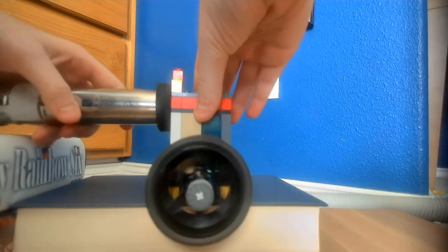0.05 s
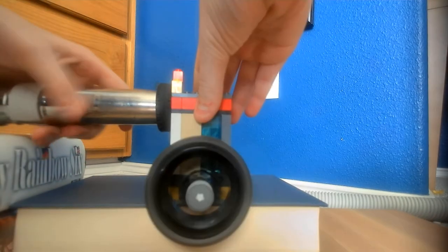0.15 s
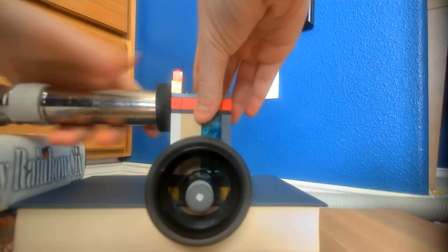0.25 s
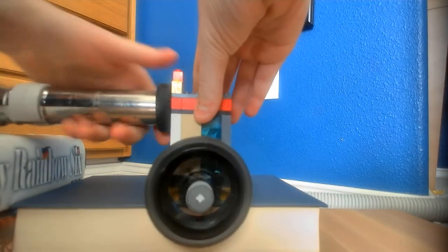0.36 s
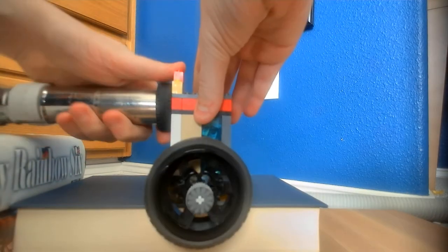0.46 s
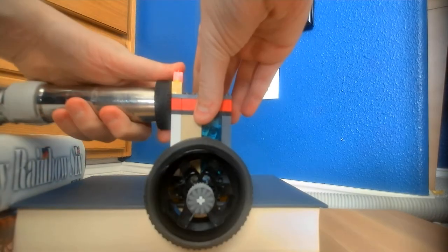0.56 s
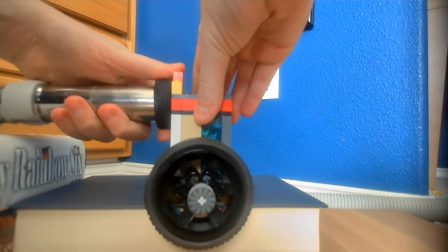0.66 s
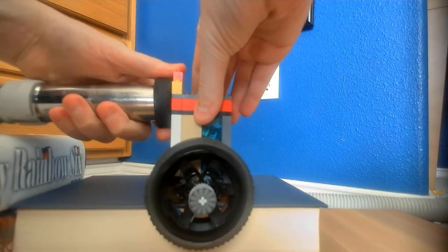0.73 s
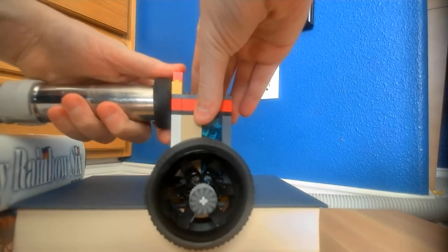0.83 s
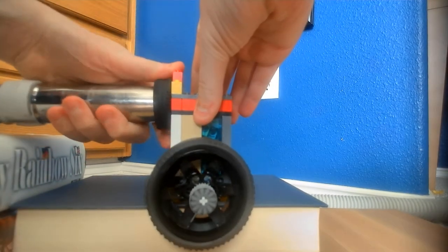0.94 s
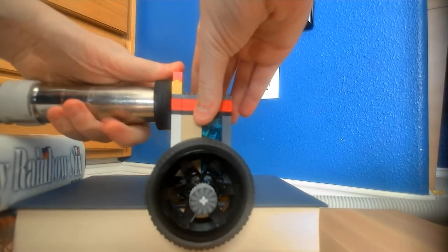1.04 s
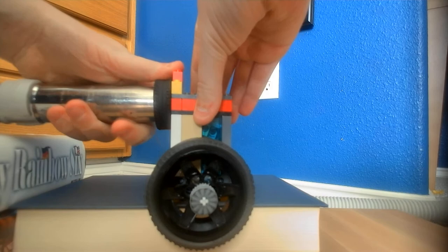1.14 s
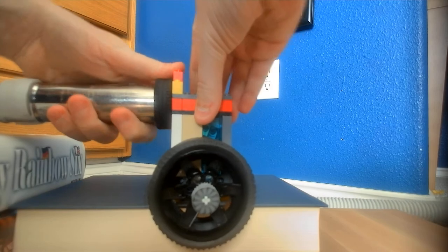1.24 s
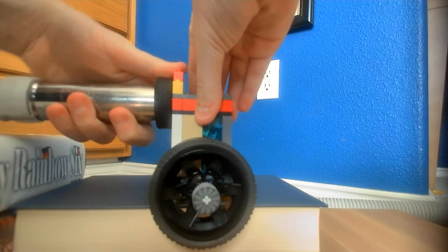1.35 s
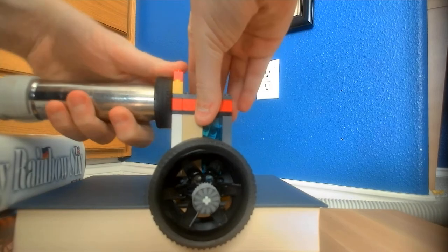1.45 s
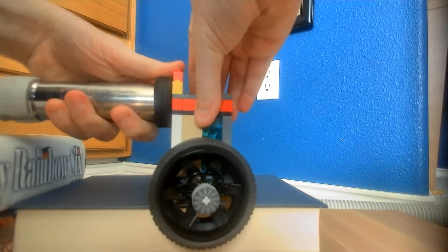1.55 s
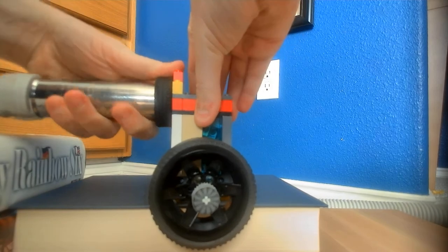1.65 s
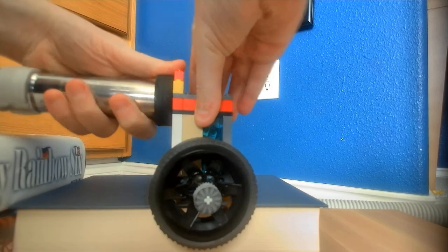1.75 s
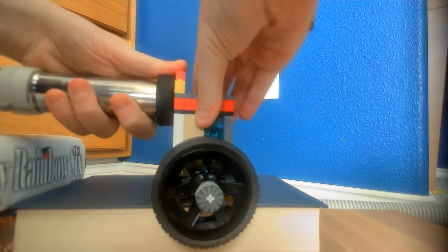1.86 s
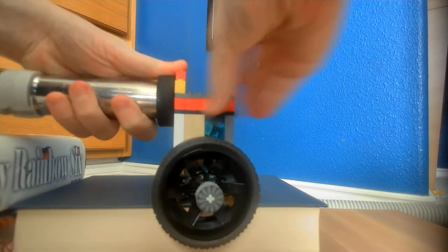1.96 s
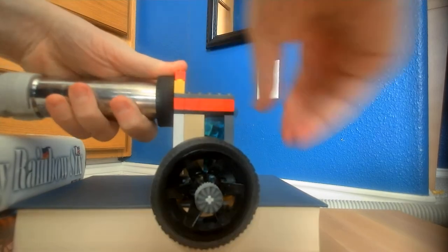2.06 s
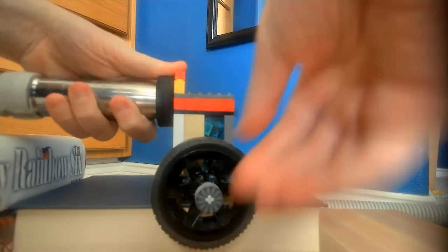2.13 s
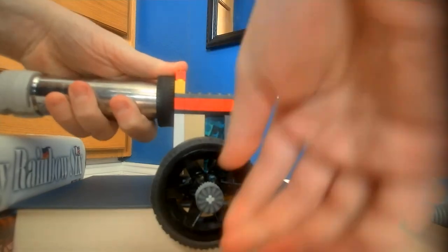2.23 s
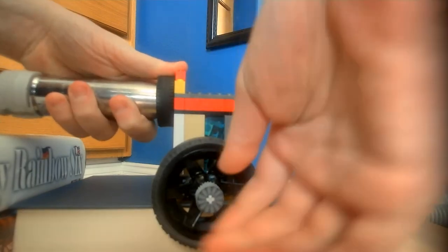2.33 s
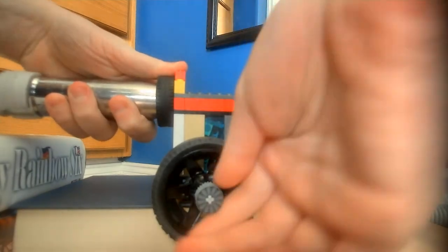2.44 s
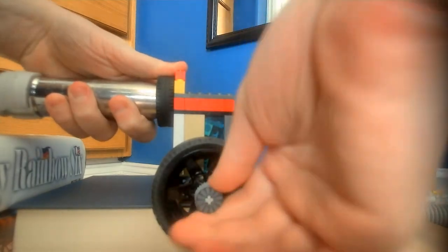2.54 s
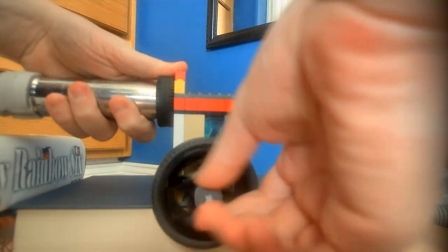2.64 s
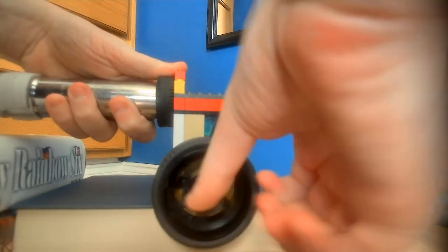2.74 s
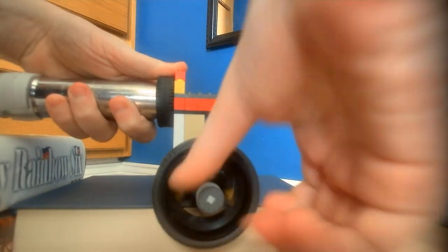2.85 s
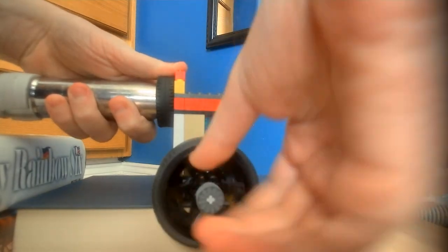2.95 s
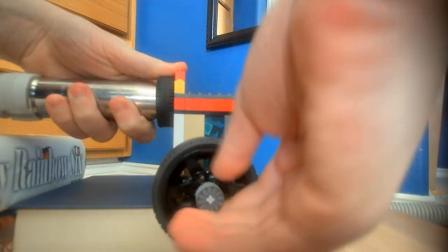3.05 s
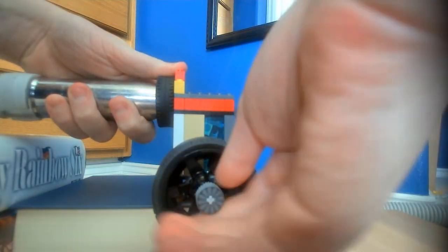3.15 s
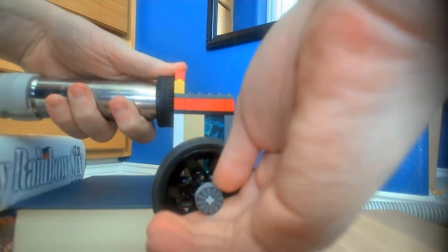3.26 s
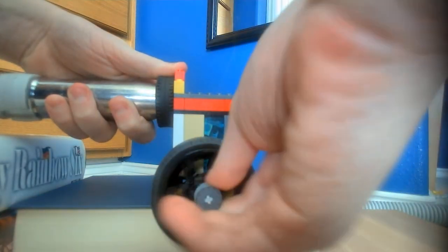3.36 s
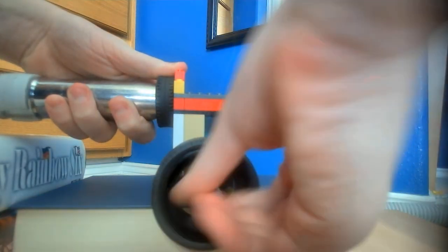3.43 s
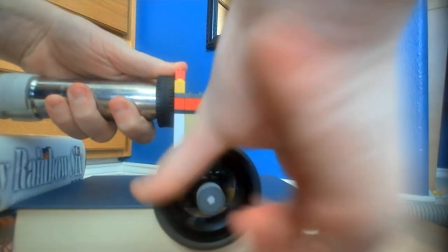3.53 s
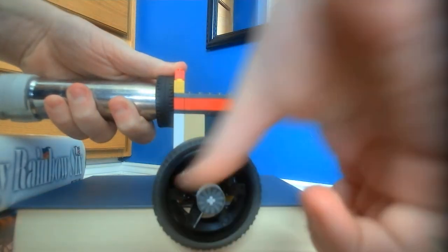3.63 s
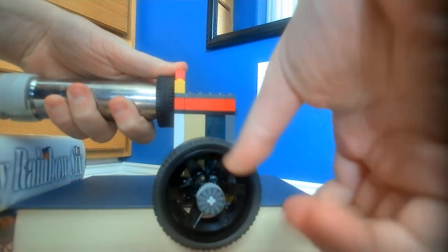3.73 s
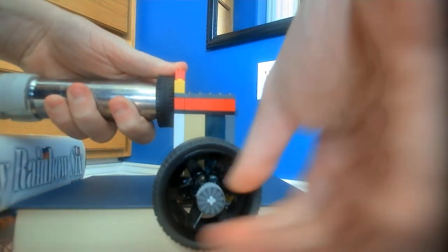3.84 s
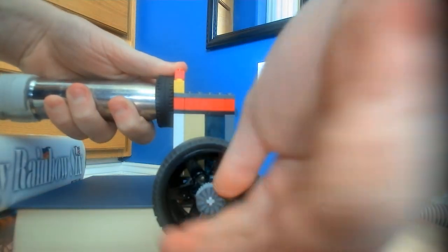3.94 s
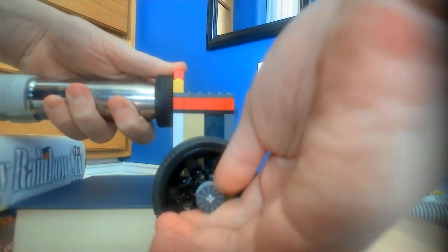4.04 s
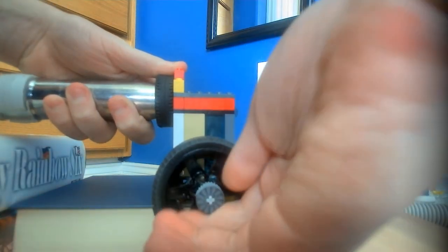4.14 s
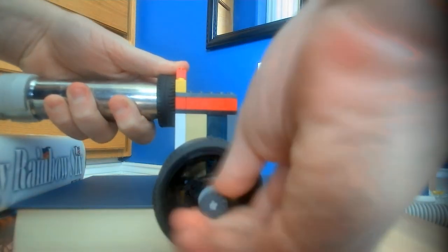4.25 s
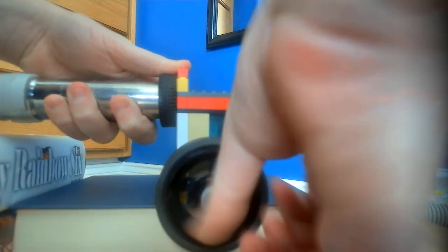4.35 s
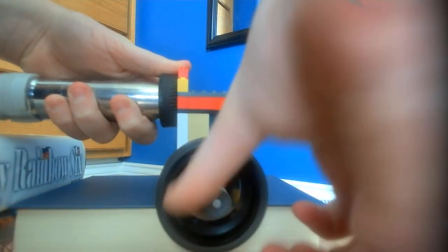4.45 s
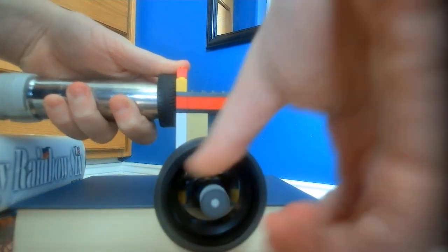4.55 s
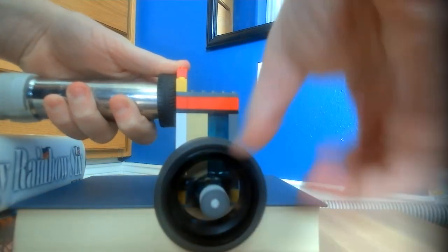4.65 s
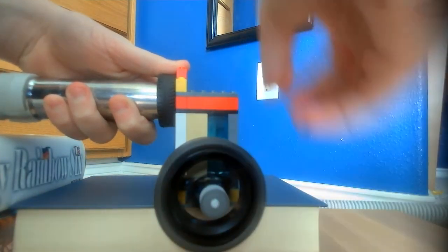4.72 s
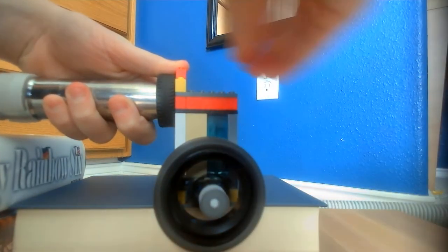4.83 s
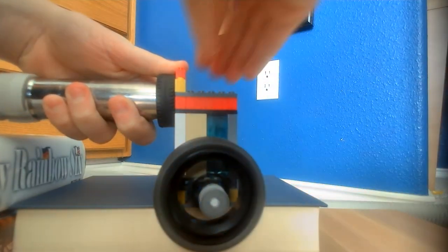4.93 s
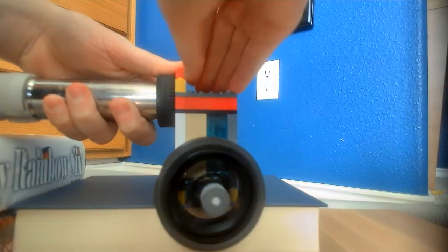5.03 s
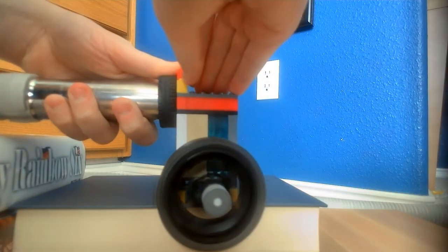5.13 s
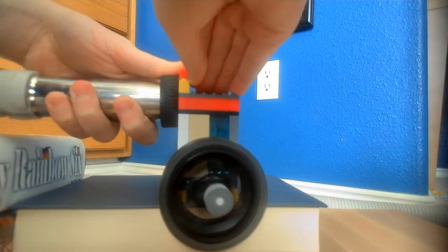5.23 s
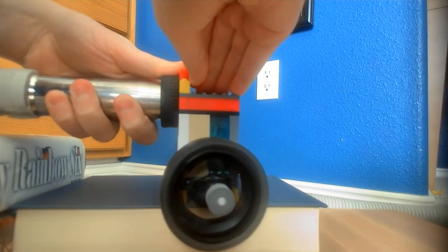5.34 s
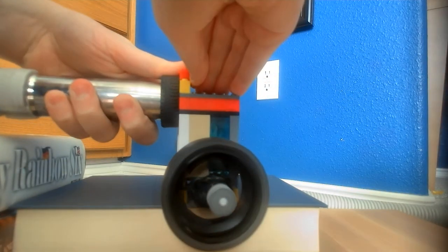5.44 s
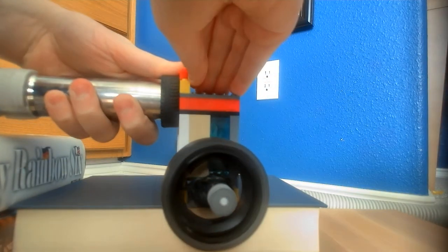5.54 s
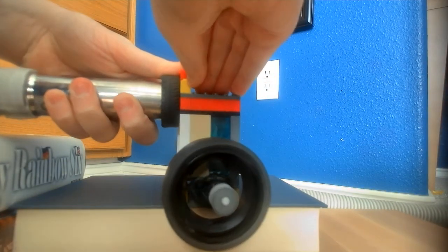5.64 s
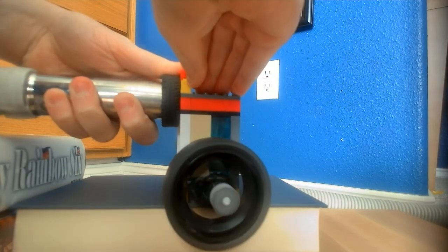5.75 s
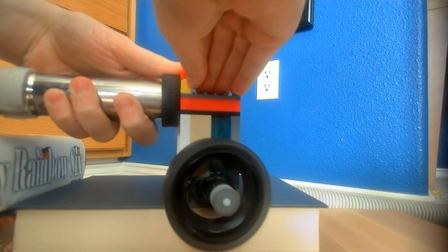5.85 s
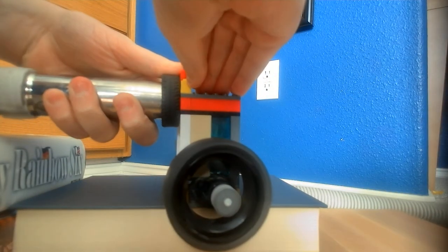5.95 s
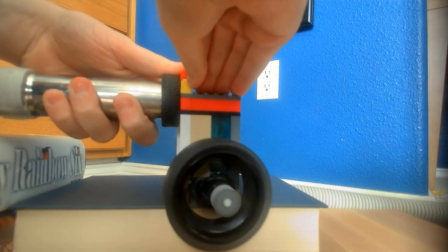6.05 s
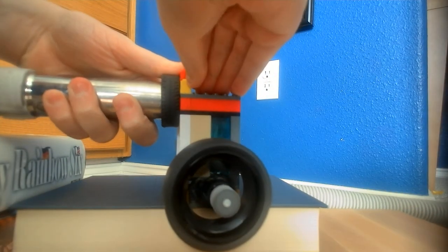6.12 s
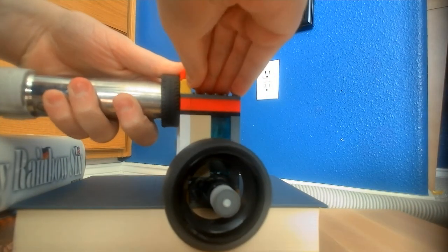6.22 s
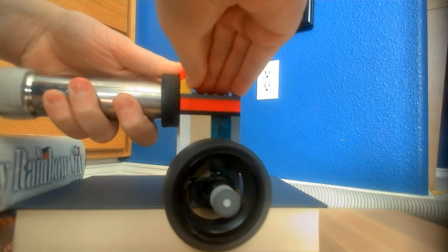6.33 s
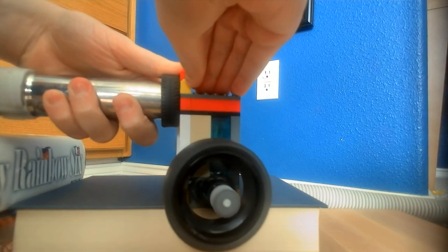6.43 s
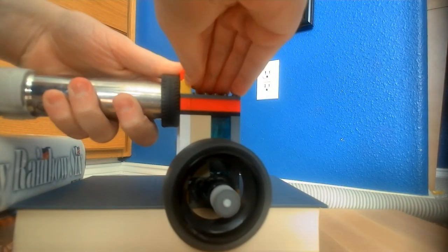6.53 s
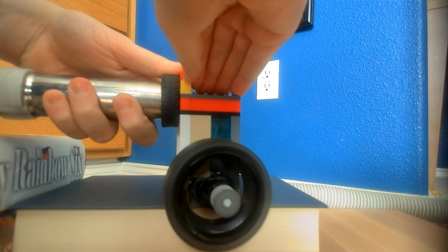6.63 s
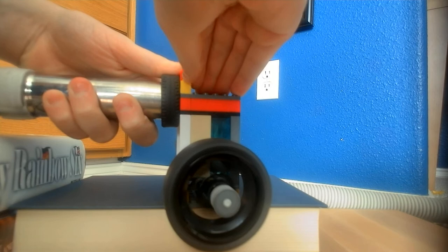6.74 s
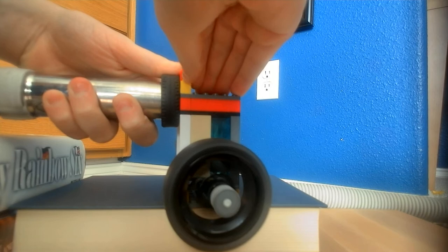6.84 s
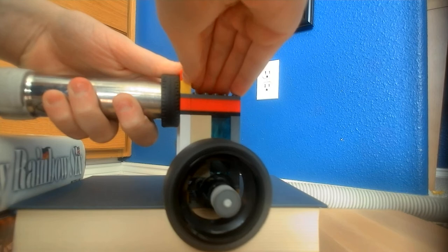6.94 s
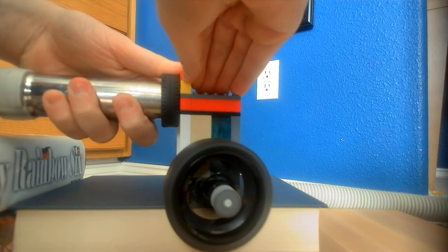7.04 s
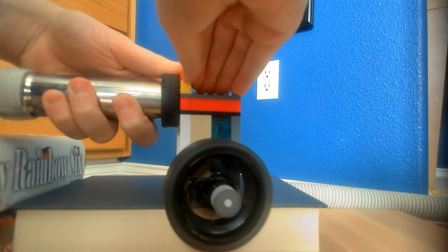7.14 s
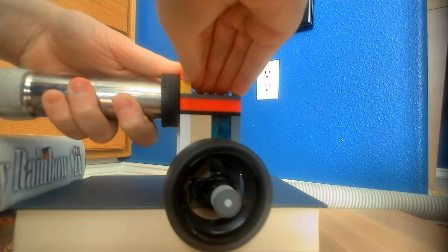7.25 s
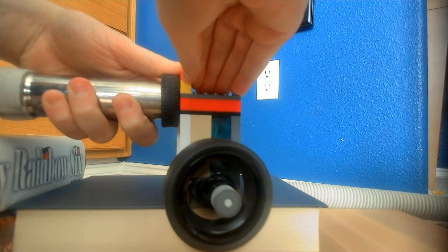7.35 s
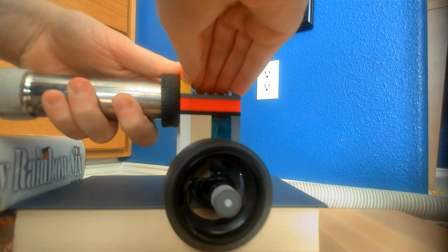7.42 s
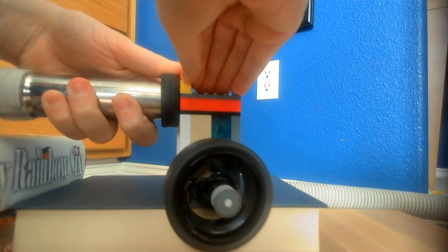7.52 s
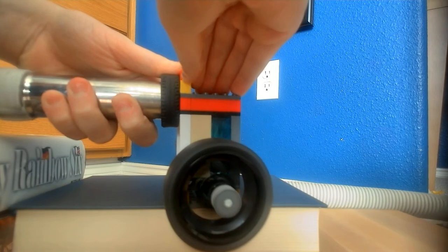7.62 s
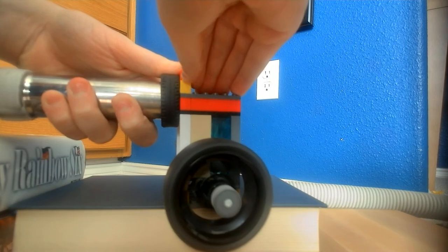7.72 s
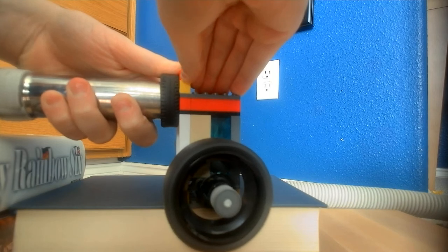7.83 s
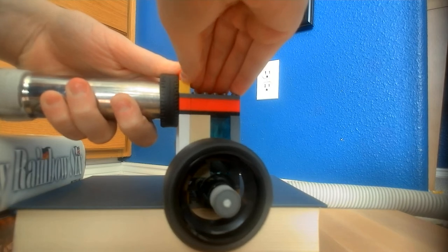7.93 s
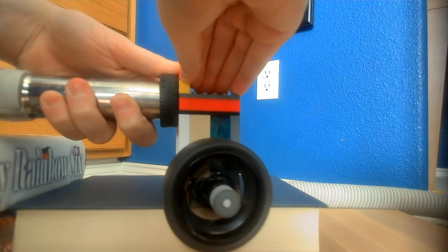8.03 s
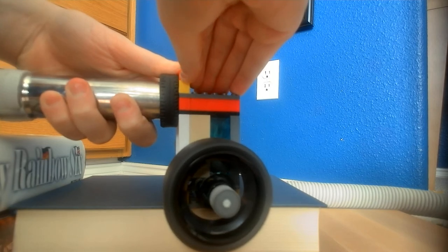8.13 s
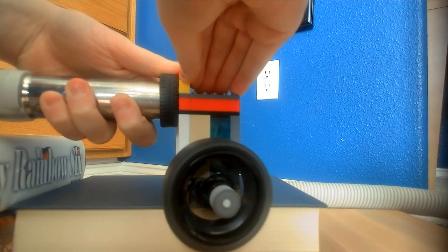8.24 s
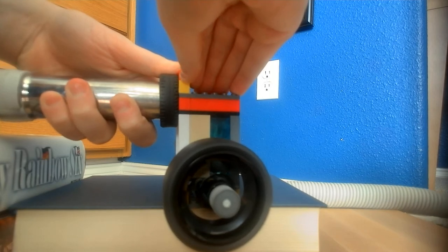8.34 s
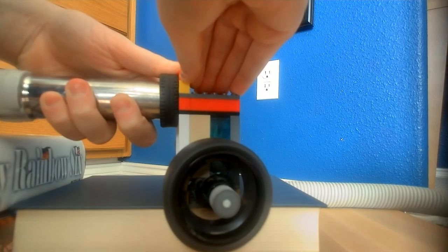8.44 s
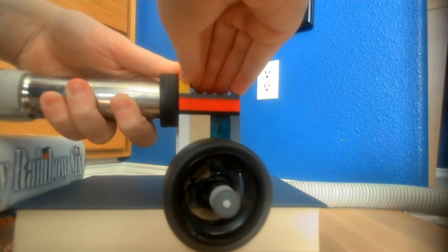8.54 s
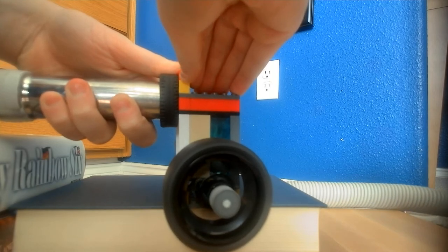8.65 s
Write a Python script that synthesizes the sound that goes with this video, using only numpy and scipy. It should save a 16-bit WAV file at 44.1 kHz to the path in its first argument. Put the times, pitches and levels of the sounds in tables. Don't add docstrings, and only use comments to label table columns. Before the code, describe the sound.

Close, overloaded suction hiss with brief squeaks and bursts, then a toy air engine starts chugging, accelerates quickly and drones with hard rattling.

```python
import sys
import numpy as np
from scipy import signal
from scipy.fft import rfft, irfft, next_fast_len
from scipy.io import wavfile
from scipy.ndimage import uniform_filter1d

SR = 44100
rng = np.random.default_rng(int(sys.argv[2]) if len(sys.argv) > 2 else 0)


def pcm_store(signal):
    levels = np.round(np.clip(np.atleast_2d(signal), -1, 1) * 32767)
    wavfile.write(sys.argv[1], SR, levels.astype(np.int16).T)


def natural_amplitude(level_db):
    exponent = np.asarray(level_db, float) / 20
    return 10 ** exponent


N = 382788
TIME = np.arange(N) / SR

# hz, level_db (per Hz)
RUMBLE_COLOUR = [(12, -38), (20, -8), (92, -7.5), (128, -6), (179, -5), (219, -3.5), (420, -8.5),
                 (550, -31), (920, -120)]
ROAR_COLOUR = [(250, -26), (420, -16), (600, -9.5), (800, -7), (900, -5), (990, -3.5), (1045, 0),
               (1100, -2.5), (1190, -8.5), (1300, -14.5), (1600, -21.5), (2600, -23), (3200, -27)]
WHISTLE_COLOUR = [(1500, -19), (1640, -1.5), (1740, -1.5), (1780, 7), (1830, -3.5), (1920, 0),
                  (2020, -20.5)]
EDGE_COLOUR = [(1900, -6.5), (2200, -7), (2900, -8.5), (3150, -3), (3320, -0.5), (3550, -2.5), (3850, 0),
               (4150, -5), (4700, -6)]
# hz, level_db (per Hz)
PORT_COLOUR = [(3900, -29), (4400, -6), (4700, 0.5), (5200, -1), (6000, 1), (6400, -1.5), (6700, 1),
               (7800, -1.5), (8600, -4), (9200, -10.5), (10000, -15)]
LOW_GAP_COLOUR = [(4600, -26), (5150, -11), (5400, 4), (5650, -8), (5950, -1.5), (6300, -4), (7000, -19)]
HIGH_GAP_COLOUR = [(6300, -13), (6900, -9.5), (7470, -2), (8000, -5), (8800, -4.5), (9400, -2.5),
                   (9900, -39)]
# hz, level_db (per Hz)
NOZZLE_COLOUR = [(8800, -22), (9700, 0), (11000, -3), (12500, -5), (14600, -3), (16500, 6)]
# pitch_hz, width_hz, level_db
NOZZLE_MODES = [(11780, 380, -1), (13200, 250, -2), (13980, 200, 4), (15620, 180, 6)]
# resting_db, full_opening_db (more),
# parked_db (more), running_db, full_speed_db (more)
AIR_LEVELS = dict(rumble=(-34.5, 7, -1, -26.5, -1), roar=(-17.5, 6.5, -5, -15, 0.5),
              whistle=(-28, 13.5, 3, -19.5, 3), edge=(-23.5, 9, -1.5, -21.5, 4.5),
              port=(-26.5, 6.5, -1, -19, 1.5), low_gap=(-27, 11, 4.5, -20, -15),
              high_gap=(-20, -1, 1, -22, 0), suction=(-19, 0, -2, -18, -0.5))
# start_s, length_s, opening (1 wide, 0 resting leak, -1 shut)
SLIDE_MOVES = [(-.05, 0.19, 0.78), (.13, .07, 0.29), (.22, 0.055, 0.65), (.25, 0.11, .3), (.34, 0.15, 0.55),
               (1.42, 0.26, 0.077), (2.575, .14, 0.86), (2.71, 0.059, -0.53), (2.755, .035, 0.62),
               (3.33, 0.12, 0.82), (3.435, 0.022, -.6), (3.47, 0.08, 0.86), (4.205, 0.038, 0.013)]
# start_s, length_s, raise_db
HAND_SHIFTS = [
    (0.087, 0.33, 6.5),
    (.9, 0.44, 3.5),
]
# start_s, length_s, pitch_hz, width_hz, level_db
SEAM_HISSES = [(-.1, .62, 5950, 700, -17), (.35, 1.1, 6000, 700, -18), (.3, .9, 8300, 1500, -20),
               (.7, 1.35, 7480, 400, -21), (.9, 1.25, 8900, 900, -19), (1.6, .45, 5500, 800, -16),
               (2.1, .3, 5800, 1000, -17), (2.16, .3, 8500, 1200, -15), (2.2, 1.1, 3320, 350, -23),
               (.2, 1.9, 3300, 350, -24), (2.85, .6, 5600, 900, -16), (2.8, .5, 7650, 500, -21),
               (3.46, .5, 7300, 900, -15), (3.48, .14, 8900, 1200, -15), (3.7, .25, 8700, 1200, -15),
               (3.5, .45, 5600, 900, -16), (3.8, .44, 5700, 900, -13)]
# start_s, length_s, from_hz, to_hz, level_db
GAP_SQUEAKS = [
    (.28, .125, 15680, 15230, -15),
    (3.395, .03, 8900, 8250, -13),
    (3.495, .025, 8950, 8450, -13),
    (2.775, .04, 4500, 4500, -27),
]
# time_s, speed (turns per s)
FLYWHEEL_SPEED = [(4.22, 14.79), (4.8, 24.11), (5.0, 27.98), (5.2, 28.76), (5.4, 31.95), (6.2, 35.39),
                  (6.5, 37.68), (6.9, 41.57), (7.05, 42.35), (7.3, 42.72), (7.5, 43.66), (7.65, 45.54),
                  (7.8, 46.22), (8.68, 46.04)]
# crank_angle (turns), ring_hz, width_hz, level_db, push (1 push, -1 pull)
SLAP_CONTACTS = [(0.052, 1192, 50, -15.9, 1), (0.271, 943, 50, -17.1, -1), (0.283, 452, 120, -9.9, 1),
                 (0.353, 399, 290, 0.0, -1), (0.655, 946, 70, -16.2, 1), (0.936, 203, 50, -15.1, 1)]
THUD_CONTACTS = [(0.073, 728, 110, -4.7, -1), (0.155, 1040, 50, -5.7, -1), (0.198, 298, 90, 0.0, -1),
                 (0.43, 642, 270, -1.0, 1), (0.803, 284, 140, -1.0, -1), (0.914, 555, 110, -0.7, 1),
                 (0.998, 1071, 210, -3.8, 1)]
RATTLE_CONTACTS = [(0.084, 1093, 110, -4.3, 1), (0.084, 810, 100, -9.9, 1), (0.135, 200, 60, -14.6, -1),
                   (0.189, 1804, 70, -13.2, 1), (0.377, 465, 260, -9.1, -1), (0.481, 782, 150, -10.6, -1),
                   (0.829, 456, 250, -6.9, -1), (0.93, 490, 210, 0.0, 1), (.2, 275, 60, -17, 1),
                   (.3, 1340, 60, -20, 1)]
# order (less one), lead (turns), level_db
PUMP_ORDERS = [(1, .28, 0), (2, .18, -8)]
# rate (per turn), level_db
RIBS = [(3, -15), (7, -18), (8, -17), (13, -16), (19, -7), (20, -5), (25, -11), (27, -11), (29, -7),
        (32, -12)]

# from and to (turns per s), level_db, db lost per turn per s below and above
SLAP, THUD, RATTLE = (28.5, 38.5, -16.5, 2.5, 4), (42, 44.5, -7.5, 2.5, 15), (45, 47, -6.5, 14, 0)
PUMP, WOBBLE = (37, 43, -17, 1.6, 1), (35, 47, -24.5, 0.5, 0)
FLUTTER, BUZZ = (31.5, 39.5, -13, 2.5, 2.5), (36.5, 43.5, -19, 3.5, 14)
SETTLE_S = 0.32
FULL_SPEED = 46
CATCH_S = FLYWHEEL_SPEED[0][0]
SLIDE_S = 0.024
PARKED_S, PARKING_S = 3.28, 0.3
SWELL = 0.26


def unit(x):
    return x / np.sqrt(np.mean(x ** 2) + 1e-20)


def flywheel_speed():
    time_s, speed = np.transpose(FLYWHEEL_SPEED)
    return np.interp(TIME, time_s, speed)


def crank():
    running = TIME >= CATCH_S
    return np.cumsum(flywheel_speed() * running) / SR, running


def shape(points):
    f, db = np.transpose(points)
    return lambda hz: natural_amplitude(np.interp(np.log(hz + 1), np.log(f), db, -120, -120))


def ring(hz, centre_hz, width_hz):
    return 1j * hz * width_hz / (centre_hz ** 2 - hz ** 2 + 1j * hz * width_hz)


def filtered(x, response):
    size = next_fast_len(N + SR // 2)
    spectra = rfft(x, size) * response(np.fft.rfftfreq(size, 1 / SR))
    return irfft(np.atleast_2d(spectra).sum(axis=0), size)[:N]


def rush(response, patchy_db):
    z = signal.stft(rng.standard_normal(N), nperseg=512)[2]
    across_pitch = uniform_filter1d(rng.standard_normal(z.shape), size=6, axis=0)
    patches = unit(uniform_filter1d(across_pitch, size=16, axis=1))
    noise = signal.istft(z * natural_amplitude(patchy_db * patches), nperseg=512)[1][:N]
    return unit(filtered(noise, response))


def hold(start_s, length_s, rise_s):
    out = np.zeros(N)
    span = slice(max(round(start_s * SR), 0), round((start_s + length_s) * SR))
    to_edge_s = np.minimum(TIME[span] - start_s, start_s + length_s - TIME[span])
    out[span] = np.clip(to_edge_s / min(rise_s, length_s / 2), 0, 1)
    return out


def add(total, start_s, length_s, db, sound):
    t = np.arange(max(round(start_s * SR), 0), round((start_s + length_s) * SR))
    to_edge_s = np.minimum(t / SR - start_s, start_s + length_s - t / SR)
    swell = np.clip(to_edge_s / (SWELL * length_s), 0, 1)
    total[t] += natural_amplitude(db) * swell * sound[:len(t)]


def air_db(*layers):
    opening = sum(wide * hold(s, length, SLIDE_S) for s, length, wide in SLIDE_MOVES)
    parked = hold(PARKED_S, 9, PARKING_S)
    caught = hold(CATCH_S + 0.02, 9, SLIDE_S)
    load = (flywheel_speed() / FULL_SPEED) ** 2
    levels = []
    for layer in layers:
        rest_db, open_db, parked_db, run_db, fast_db = AIR_LEVELS[layer]
        at_rest = rest_db + open_db * opening + parked_db * parked
        levels.append((1 - caught) * at_rest + caught * (run_db + fast_db * load))
    return levels


def valve(open_at, depth_db):
    turns, running = crank()
    smoothing = np.clip(1.5 - 0.019 * flywheel_speed(), 0.3, 2)
    swing = np.tanh(1.35 * np.cos(2 * np.pi * (turns - open_at)) - 0.3)
    gain = natural_amplitude(depth_db * smoothing * swing)
    return np.where(running, gain / np.sqrt(np.mean(gain[running] ** 2)), 1)


def wand():
    rumble_db, roar_db, whistle_db, edge_db = air_db("rumble", "roar", "whistle", "edge")
    hands_db = sum(db * hold(s, length, SWELL * length) for s, length, db in HAND_SHIFTS)
    rumble = natural_amplitude(rumble_db + hands_db) * rush(shape(RUMBLE_COLOUR), patchy_db=1.0)
    roar = natural_amplitude(roar_db + 2.1) * valve(0.58, depth_db=3.5) * rush(shape(ROAR_COLOUR), patchy_db=1.23)
    whistle = natural_amplitude(whistle_db + 2.6) * valve(0.013, depth_db=2.0) * rush(shape(WHISTLE_COLOUR), patchy_db=1.0)
    edge = natural_amplitude(edge_db + 1.5) * valve(0.72, depth_db=5.0) * rush(shape(EDGE_COLOUR), patchy_db=0.97)
    return rumble + roar + whistle + edge


def leak():
    port_db, low_db, high_db = air_db("port", "low_gap", "high_gap")
    port = natural_amplitude(port_db + 9.0) * valve(0.67, depth_db=6.0) * rush(shape(PORT_COLOUR), patchy_db=0.87)
    low_gap = natural_amplitude(low_db + 1.0) * rush(shape(LOW_GAP_COLOUR), patchy_db=3.4)
    high_gap = natural_amplitude(high_db + 1.0) * rush(shape(HIGH_GAP_COLOUR), patchy_db=2.5)
    return port + valve(0.66, depth_db=4.0) * (low_gap + high_gap)


def nozzle():
    def response(hz):
        modes = sum(natural_amplitude(db) * abs(ring(hz, centre, width)) ** 2 for centre, width, db in NOZZLE_MODES)
        return shape(NOZZLE_COLOUR)(hz) + modes

    level_db = air_db("suction")[0] + 4.0
    return natural_amplitude(level_db) * valve(0.64, depth_db=2.9) * rush(response, patchy_db=1.0)


def seams():
    total = np.zeros(N)
    for s, length, hz, width, db in SEAM_HISSES:
        band = signal.butter(2, [hz - width / 2, hz + width / 2], "bandpass", fs=SR, output="sos")
        hiss = unit(signal.sosfilt(band, rng.standard_normal(2 * SR)))
        add(total, s, length, db - 2, hiss)
    return total


def squeaks():
    t, total = np.arange(SR // 2) / SR, np.zeros(N)
    for s, length, from_hz, to_hz, db in GAP_SQUEAKS:
        drift = unit(uniform_filter1d(rng.standard_normal((2, len(t))), size=160))
        rough = unit(1.8 + drift)
        angle = 2 * np.pi * np.cumsum(np.interp(t, [0, length], [from_hz, to_hz])) / SR
        add(total, s, length, db, rough[0] * np.cos(angle) + rough[1] * np.sin(angle))
    return total


def loose_db(low, high, db, below_db, above_db):
    speed = uniform_filter1d(flywheel_speed(), size=round(SETTLE_S * SR))
    return db - below_db * np.maximum(low - speed, 0) - above_db * np.maximum(speed - high, 0)


def chuff():
    def cavities(hz):
        return sum(abs(ring(hz, centre, width)) ** 2 for centre, width in [(3500, 240), (4700, 420)])

    turns, running = crank()
    puff = np.exp(6.2 * (np.cos(2 * np.pi * (turns - 0.63)) - 1))
    air = unit(filtered(rng.standard_normal(N), cavities))
    return natural_amplitude(loose_db(0, 34, -25.5, 0, 0.49)) * running * unit(puff) * air


def contacts(table, level_db, scatter_db, slack):
    turns, running = crank()
    angle, hz, width, db, push = np.transpose(table)[..., None]
    size, play = rng.standard_normal((2, int(turns[-1]) + 2))
    when = np.searchsorted(turns, np.arange(len(play)) + angle + slack * play)
    blows = np.zeros((len(table), N + 1))
    np.put_along_axis(blows, when, push * natural_amplitude(db + scatter_db * size) / width, axis=1)
    total = filtered(blows[:, :N], lambda f: ring(f, hz, width) * ring(f, hz, 3 * width))
    return natural_amplitude(level_db) * running * total / np.sqrt(np.mean(total[-SR:] ** 2))


def piston_knocks():
    slaps = contacts(SLAP_CONTACTS, loose_db(*SLAP), scatter_db=1.5, slack=0.0015)
    thuds = contacts(THUD_CONTACTS, loose_db(*THUD), scatter_db=1.2, slack=0.0012)
    rattles = contacts(RATTLE_CONTACTS, loose_db(*RATTLE), scatter_db=-0.1, slack=0.00038)
    return slaps + thuds + rattles


def piston_pump():
    turns, running = crank()
    swing = sum(natural_amplitude(db) * np.cos(2 * np.pi * ((k + 1) * turns + lead)) for k, lead, db in PUMP_ORDERS)
    return natural_amplitude(loose_db(*PUMP) + 2.0) * running * swing


def wheel():
    turns, running = crank()
    ribs = sum(natural_amplitude(db) * np.cos(2 * np.pi * k * (turns - 0.27)) for k, db in RIBS)
    flutter = natural_amplitude(loose_db(*FLUTTER)) * ribs
    wobble = natural_amplitude(loose_db(*WOBBLE)) * np.cos(2 * np.pi * (turns - 0.12))
    buzz = natural_amplitude(loose_db(*BUZZ)) * np.cos(2 * np.pi * (4 * turns + 0.038))
    return running * (flutter + wobble + buzz)


def scene():
    air = wand() + leak() + nozzle() + seams() + squeaks()
    engine = chuff() + piston_knocks() + piston_pump() + wheel()
    mono = air + engine
    return np.array([mono, mono])


def band_limit(x):
    return signal.sosfilt(signal.butter(12, 15720, fs=SR, output="sos"), x)


def record(dry):
    driven, ceiling, knee = natural_amplitude(2.5) * dry, 0.7, 3.5
    mix = driven / (1 + abs(driven / ceiling) ** knee) ** (1 / knee)
    return band_limit(mix)


dry = scene()
out = record(dry)
pcm_store(out)
```